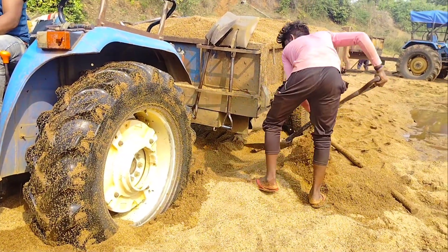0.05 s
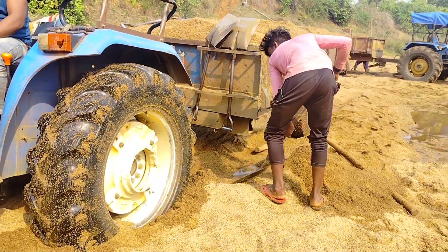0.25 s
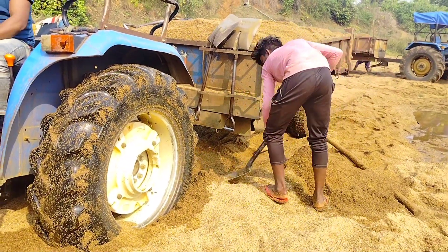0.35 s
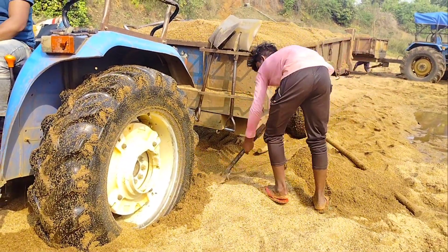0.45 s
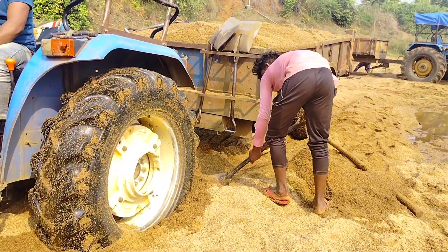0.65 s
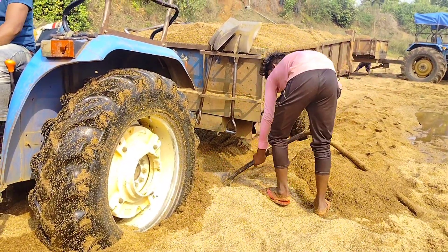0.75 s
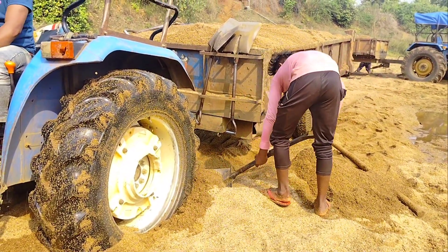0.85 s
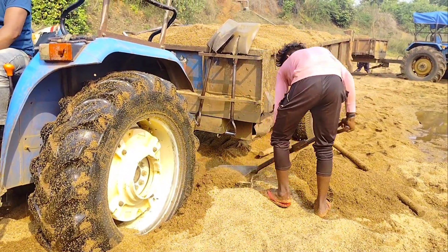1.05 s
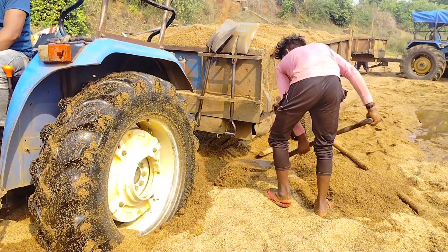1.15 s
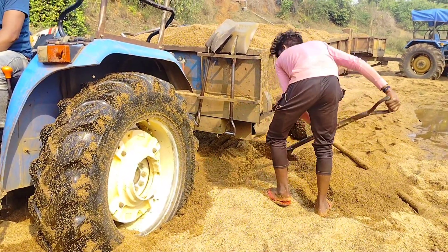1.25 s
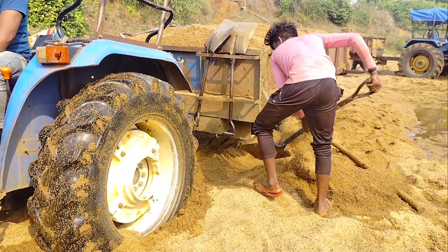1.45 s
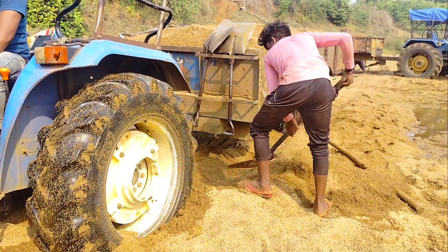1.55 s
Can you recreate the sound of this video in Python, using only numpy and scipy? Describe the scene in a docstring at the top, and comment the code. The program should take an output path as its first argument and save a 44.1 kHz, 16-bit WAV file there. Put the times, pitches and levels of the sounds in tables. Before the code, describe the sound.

Shovel crunching into sand outdoors, scraping along and spilling its load with stony clinks.

```python
"""Outdoors, a few steps from a phone's two microphones: a steel shovel works loose sand in still air.
A few grains trickle, then at 0.2 s the blade is thrust in: sand ticks against itself and the steel,
the blade rings, clods thud. From 0.6 s it is dragged, with a softer crunch and a few more thuds.
Near 1.2 s it is lifted and emptied: stones clink on the steel and the spill thins to a faint hiss.
Each microphone port colours the sound differently."""
import sys
import numpy as np
from scipy import signal
from scipy.io import wavfile
from scipy.ndimage import uniform_filter1d

SR = 44100
rng = np.random.default_rng(int(sys.argv[2]) if len(sys.argv) > 2 else 0)


def transcribe(u):
    """Save the signal u as a 16-bit wav file named by the first command-line argument.

    u: samples, shape (n,) or (channels, n), limited to [-1, 1]; the rate is SR.
    q: integer samples, one column per channel.
    """
    v = np.clip(np.atleast_2d(u).T, -1, 1)
    q = np.round(v * 32767).astype(np.int16)
    wavfile.write(sys.argv[1], SR, q)


N = 70560  # 1.6 s


def amp(db):
    return 10 ** (np.asarray(db) / 20)


def unit_rms(x):
    return x / np.sqrt(np.mean(x ** 2) + 1e-20)


def wander(seconds):
    """Smooth random drift of unit spread."""
    size = max(round(seconds * SR), 2)
    return unit_rms(uniform_filter1d(uniform_filter1d(rng.standard_normal(N), size), size))


def colour(x, *curves):
    """Causal filter whose gain is the sum of (Hz, dB) curves."""
    log_hz = np.log(np.abs(np.fft.fftfreq(4096, 1 / SR)) + 1)
    gain_db = sum(np.interp(log_hz, np.log(hz), db) for hz, db in map(np.transpose, curves))
    minimum_phase = np.exp(np.conj(signal.hilbert(np.log(amp(gain_db)))))
    taps = np.fft.ifft(minimum_phase).real
    return signal.oaconvolve(x, taps[:1024])[:len(x)]


LAG_S, LOW_LAG_S = 0.0006, 0.00021
def arrive(x, lag_s):
    """The left port is farther from the blade and hears it later."""
    return np.array([np.roll(x, round(lag_s * SR)), x])


# Response of each microphone port. Each row: frequency in Hz, gain in dB.
LEFT_PORT = [(100, -16.5), (600, -8), (800, -1.5), (980, -1), (1120, -10), (1270, -14), (1420, 0),
             (1650, 2.5), (2000, 7), (2900, 10), (3900, 7.5), (4300, 8.5), (4600, 8), (5300, 11), (6500, 6),
             (7600, 17), (8800, 1), (9800, 2), (11500, 6.5), (14000, 1.5), (15800, -12.5)]
RIGHT_PORT = [(100, -15.5), (450, -10), (650, -18), (820, -1), (960, -6.5), (1100, -9.5), (1220, -7),
              (1350, 12), (1650, 1.5), (2000, -0.5), (2530, -4.5), (2900, -0.5), (4300, 2.5), (5200, 5),
              (6500, 7), (7800, 17), (9000, 4), (9900, -4), (11000, 6), (15000, -15)]
def ports(stereo, *spectra):
    """A source, shaped by its spectrum if given, as each port hears it."""
    return np.array([colour(stereo[0], *spectra, LEFT_PORT), colour(stereo[1], *spectra, RIGHT_PORT)])


# The open air around the phone. Each row: frequency in Hz, relative level in dB.
AIR_SPECTRUM = [(25, -18), (50, 0), (95, 8.5), (200, 1), (384, -12.5), (1070, -25), (1650, -35.5),
                (2840, -14), (10100, -37.5), (16000, -10)]
def air():
    """Faint outdoor hush, unrelated at the two ports and a touch louder on the right."""
    hush = unit_rms(ports(rng.standard_normal((2, N)), AIR_SPECTRUM))
    return amp([[-65.25], [-64.75]]) * hush


# Clods in the sand. Each row: start in seconds, peak in dB, pitch in Hz, rise in seconds.
CLODS = [(0.271, -40.5, 306, 0.0047), (0.394, -40, 362, 0.0033), (0.613, -47, 365, 0.0086),
         (0.629, -42, 315, 0.016), (0.67, -50.5, 345, 0.003), (0.811, -48, 237, 0.0057)]
def clods(t60_s=0.062):
    """Each clod thuds: a low tone that swells and dies quickly."""
    t = np.arange(4000) / SR
    thuds = np.zeros(N)
    for start, peak_db, hz, rise_s in CLODS:
        swell = np.sin(np.pi / 2 * np.minimum(t / rise_s, 1)) ** 2
        decay = amp(peak_db - 60 * np.maximum(t - rise_s, 0) / t60_s)
        thuds[round(start * SR):][:len(t)] += swell * decay * np.sin(2 * np.pi * hz * t)
    return arrive(thuds, LOW_LAG_S)


# The blade's modes. Each row: frequency in Hz, relative level in dB, seconds to fall 60 dB.
BLADE_MODES = [(905, -22.5, 0.11), (1309, -4.5, 0.041), (1498, 2.5, 0.012), (1937, -7.5, 0.032),
               (2140, -13, 0.023), (2465, -13.5, .035), (2576, -2, 0.029), (2763, -5.5, 0.018),
               (2888, -1.5, 0.044), (3237, -4, 0.034), (3410, -7, 0.031), (3607, -4, 0.028),
               (3713, -7, 0.077), (3953, 0.5, 0.036), (4500, -15.5, 0.11), (4820, -46, 0.028),
               (5246, -11.5, 0.039), (5592, -10, 0.09), (6080, -10.5, 0.055), (7130, -17.5, 0.037),
               (7560, -11, 0.074), (7880, -19.5, 0.03)]
# Edges in Hz of the low, middle, main, high and top groups of modes.
MODE_GROUP_EDGES = [0, 1700, 2350, 3100, 6500, 20000]
# Where sand touches, it favours some main modes. Each row: time in seconds, favoured frequency in Hz.
SAND_CONTACT = [(0, 2360), (.1, 2500), (.2, 2840), (.4, 2740), (.5, 2500), (.6, 2580), (.7, 2730),
                (.77, 3040), (.95, 2850), (1.03, 2860), (1.4, 2730), (1.47, 2600), (1.56, 2870),
                (1.6, 2880)]
def blade_ring(drive, wander_db=2.2, wander_s=0.05, fall_db_per_khz=32):
    """Grains ring the steel, one signal a group; modes swell and fade as the contact point wanders."""
    t = np.arange(2400) / SR
    groups = np.zeros((len(MODE_GROUP_EDGES) - 1, 2, N))
    favoured_hz = np.interp(np.arange(N) / SR, *np.transpose(SAND_CONTACT))
    for hz, db, t60 in BLADE_MODES:
        group = np.searchsorted(MODE_GROUP_EDGES, hz) - 1
        mode = amp(db - 60 * t / t60) * np.sin(2 * np.pi * hz * t)
        drive_db = wander_db * wander(wander_s)
        if group == 2:  # the main modes
            drive_db -= fall_db_per_khz * abs(hz - favoured_hz) / 1000
        groups[group] += signal.oaconvolve(drive * amp(drive_db), mode[None], axes=1)[:, :N]
    return [ports(x) for x in groups]


# Stones on the blade. Each row: start in seconds, ring gain in dB, centre of the ring in Hz,
# fall-off from that centre in dB per kHz, tick gain in dB.
STONES = [(0.054, -48, 2450, 22, -66), (0.0235, -47, 2520, 23, -64), (0.0324, -60, 2500, 19, -61),
          (0.05, -42.5, 3200, 22, -62), (0.613, -65, 1500, -1.5, -50), (0.6365, -52.5, 2560, 24, -38.5),
          (0.766, -60, 1950, 2, -42.5), (0.8146, -43.5, 1500, 8, -46), (0.8395, -43, 3430, 4, -44),
          (0.8573, -45, 2900, 15, -48), (1.2077, -46.5, 1310, 29, -56), (1.264, -36, 905, 43, -55),
          (1.2738, -38.5, 2500, 6, -29), (1.282, -33, 3080, 6, -34), (1.289, -34.5, 3150, 14, -39),
          (1.301, -36, 905, 48, -48), (1.3206, -37, 2200, 21, -42), (1.366, -45, 2970, 14, -55)]
# A stone's gritty tick. Each row: frequency in Hz, gain in dB.
TICK_SPECTRUM = [(300, -40), (1200, -5), (3000, 3.5), (8000, -4.5), (15000, -26)]
def stones(tick_rise_s=0.0004, tick_t60_s=0.0041, ring_rise_s=0.0008):
    """Stones tick on the steel; where each lands sets which modes ring most."""
    t = np.arange(4000) / SR
    hz, db, t60 = np.transpose(BLADE_MODES)[:, :, None]
    modes = np.minimum(t / ring_rise_s, 1) * amp(db - 60 * t / t60) * np.sin(2 * np.pi * hz * t)
    tick_shape = np.minimum(t / tick_rise_s, 1) * amp(-60 * t / tick_t60_s)
    ticks, rings = np.zeros(N), np.zeros((len(BLADE_MODES), N))
    for start, ring_db, centre_hz, fall, tick_db in STONES:
        span = slice(round(start * SR), round(start * SR) + len(t))
        ticks[span] += amp(tick_db) * tick_shape * np.sign(rng.standard_normal(len(t)))
        rings[:, span] += amp(ring_db - fall * abs(hz - centre_hz) / 1000) * modes
    bright = colour(ticks, TICK_SPECTRUM) + rings[1:].sum(0)
    return ports(arrive(bright, LAG_S) + arrive(rings[0], LOW_LAG_S))


def grains(shared, lag_s=LAG_S, per_s=9000, spread_db=2.5, clump_db=1, clump_s=0.0056):
    """Clumped sand ticks of unequal size; the shared part of their power reaches both ports."""
    hits = rng.random((3, N)) < per_s / SR
    size_db = spread_db * np.minimum(rng.exponential(1, (3, N)), 5)
    polarity = np.sign(rng.standard_normal((3, N)))
    ticks = hits * polarity * amp(size_db + clump_db * wander(clump_s))
    return np.sqrt(shared) * arrive(ticks[0], lag_s) + np.sqrt(1 - shared) * ticks[1:]


# The sand's four voices. Each row: frequency in Hz, relative level in dB.
SCRAPE_SPECTRUM = [(150, -63), (450, -44), (1000, -20), (1400, -20), (2300, -8), (3400, -2), (5000, -6.5),
                   (6500, -16.5), (8500, -61), (12000, -35.5)]
CRUNCH_SPECTRUM = [(60, -56), (130, -28), (200, -1.5), (300, 4), (500, 4.5), (800, -7), (1100, -6.5),
                   (1600, -32.5)]
GRIT_SPECTRUM = [(3500, -32), (6000, -2), (7800, -6), (9500, -0.5), (12000, -44)]
HISS_SPECTRUM = [(7000, -33), (10000, -13.5), (12500, -10.5), (15000, 2), (16000, -0.5)]
# The blade turning towards the left port. Each row: time in seconds, left over right in dB.
BLADE_TURN = [(0, 7.5), (.2, -2), (.42, 0.5), (.55, 0.5), (1.0, 5), (1.2, 0), (1.42, -1), (1.5, 3.5),
              (1.6, 1.5)]
# The shovel's moves, a few steps away. Each row: time in seconds, then levels in dB of the scrape on
# the blade, low crunch, fine grit, hiss of spilling sand, and the low, middle and main ring.
SHOVEL_LEVELS = [(0.0, -58.5, -79, -56.5, -54.5, -76, -66, -59),
                 (0.024, -59, -77, -53, -54.5, -75, -98, -50.5),
                 (0.066, -55, -78, -58, -55.5, -71.5, -85, -55),
                 (0.16, -68, -79.5, -66.5, -66.5, -83, -82, -69),
                 (0.188, -70, -78, -81, -72, -85, -86, -70), (0.204, -42, -71, -45.5, -45, -63, -52, -58),
                 (0.218, -30, -58, -27.5, -31.5, -44, -44, -29.5),
                 (0.23, -25, -56, -29, -29.5, -41.5, -35, -33),
                 (0.259, -20, -47, -24.5, -29, -55, -38, -27),
                 (0.276, -22, -46.5, -23, -26, -42.5, -34.5, -30.5),
                 (0.317, -23.5, -43, -28.5, -31, -37, -41.5, -44),
                 (0.36, -27.5, -48, -32, -36.5, -49.5, -40.5, -35),
                 (0.403, -32, -42, -36.5, -42, -49, -55.5, -38),
                 (0.417, -37, -46.5, -43.5, -51, -42, -60, -45),
                 (0.444, -43, -54, -53.5, -58, -74, -64, -43), (0.5, -54.5, -70, -63, -64.5, -83, -62, -55),
                 (0.582, -63, -63.5, -73, -84, -72, -64.5, -58),
                 (0.626, -55, -59, -94, -92, -51.5, -64, -48),
                 (0.641, -46.5, -54.5, -51, -79, -74, -60, -47.5),
                 (0.664, -59, -58.5, -74, -86, -59.5, -67, -54.5),
                 (0.744, -65.5, -66.5, -73, -72, -63, -67.5, -55.5),
                 (0.763, -58, -65, -70, -72, -64, -58, -52), (0.769, -60, -52, -65, -66, -71, -50.5, -46),
                 (0.796, -56, -64, -68, -69, -56, -62, -47),
                 (0.814, -52.5, -58, -52.5, -67, -58, -47, -51.5),
                 (0.834, -54, -58.5, -61, -68, -51, -62, -56),
                 (0.843, -50, -58, -63, -62, -48.5, -57, -51.5),
                 (0.894, -45, -62.5, -57, -62.5, -57.5, -54, -48),
                 (0.922, -44.5, -63.5, -55, -63.5, -58, -61, -46.5),
                 (0.982, -49, -71, -63, -65.5, -57, -64, -53),
                 (1.014, -59, -71.5, -66.5, -68, -75, -68, -61),
                 (1.136, -69.5, -82.5, -67, -69, -73.5, -83, -73.5),
                 (1.176, -57.5, -79, -64.5, -60, -106, -67, -56),
                 (1.211, -48.5, -82, -50, -57, -62.5, -65, -51.5),
                 (1.251, -54, -93, -53, -54, -65, -58, -49.5),
                 (1.274, -35, -85, -44.5, -39.5, -59, -44, -47),
                 (1.288, -43, -89, -45.5, -42.5, -51, -69, -44.5),
                 (1.304, -38.5, -94, -48, -46, -53.5, -57, -58),
                 (1.322, -38, -99, -48.5, -43.5, -66, -65, -41),
                 (1.349, -52.5, -86, -53, -54, -69, -60.5, -56.5),
                 (1.426, -59, -83, -56, -50.5, -81, -73, -66.5),
                 (1.498, -50.5, -72, -54.5, -54, -66.5, -73, -47),
                 (1.6, -55.5, -77.5, -59.5, -53, -69.5, -82, -60.5)]
def shovelled_sand():
    """Four sizes of grain and the ring of the steel swell and fade with the shovel's moves."""
    t = np.arange(N) / SR
    turn = amp(np.interp(t, *np.transpose(BLADE_TURN)) * np.array([[0.5], [-0.5]]))
    low, middle, main, high, top = blade_ring(grains(shared=0.54))
    scrape = unit_rms(ports(grains(shared=0.33), SCRAPE_SPECTRUM)) + amp(-1.5) * unit_rms(high)
    crunch = ports(grains(shared=0.91, lag_s=LOW_LAG_S), CRUNCH_SPECTRUM)
    grit = unit_rms(ports(grains(shared=0.33), GRIT_SPECTRUM)) + amp(-2.5) * unit_rms(top)
    hiss = ports(grains(shared=0.057), HISS_SPECTRUM)
    layers = [scrape * turn, crunch, grit, hiss, low * turn, middle * turn, main * turn]
    times, *levels = np.transpose(SHOVEL_LEVELS)
    return sum(amp(np.interp(t, times, db)) * unit_rms(x) for db, x in zip(levels, layers))


def scene():
    return shovelled_sand() + stones() + clods() + air()


def record(dry, bass_hz=70, top_hz=16100):
    """The phone's small microphones roll off the bass; the band ends sharply at the top."""
    thin = signal.sosfilt(signal.butter(2, bass_hz, "high", fs=SR, output="sos"), dry)
    band_limit = signal.firwin(511, top_hz, window=("kaiser", 9), fs=SR)
    return signal.oaconvolve(thin, band_limit[None], "same")


dry = scene()
out = record(dry)
transcribe(out)
```